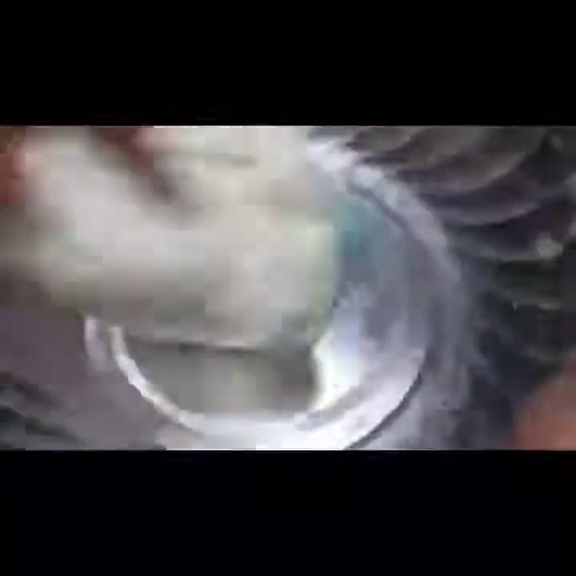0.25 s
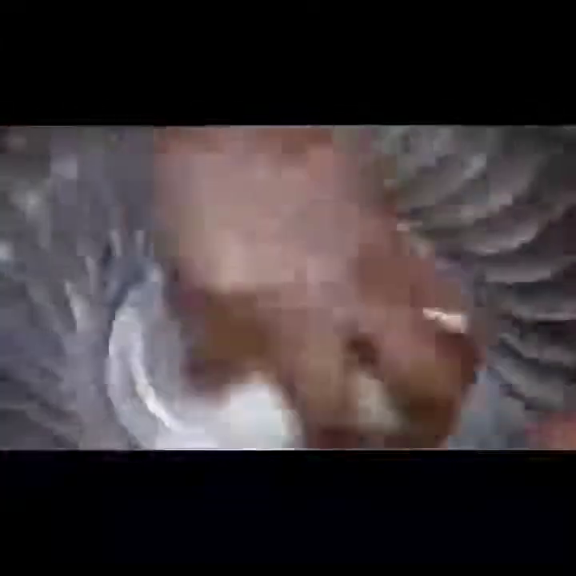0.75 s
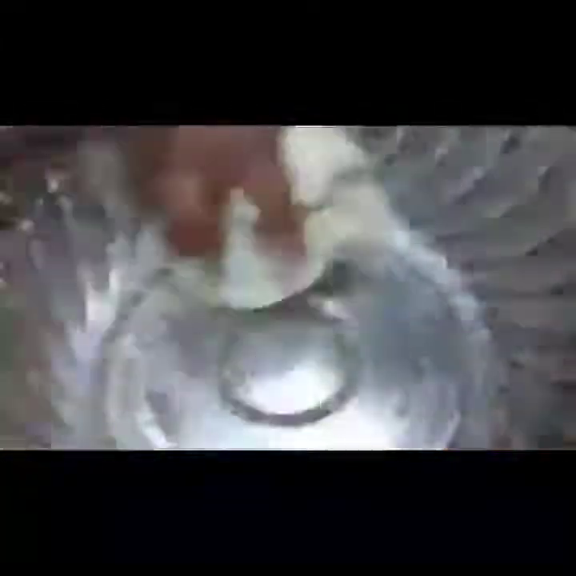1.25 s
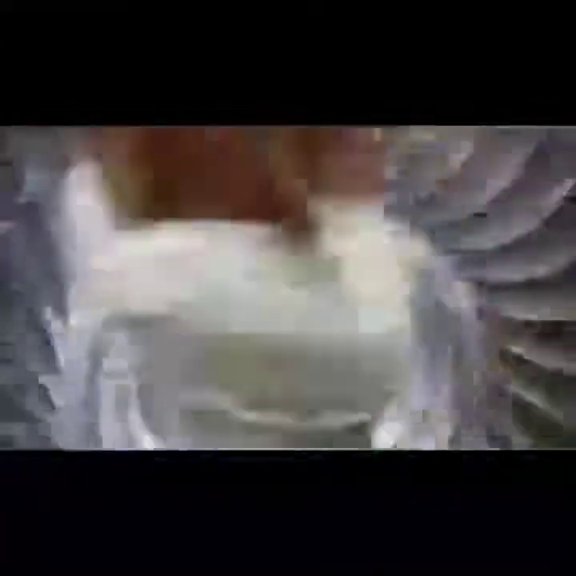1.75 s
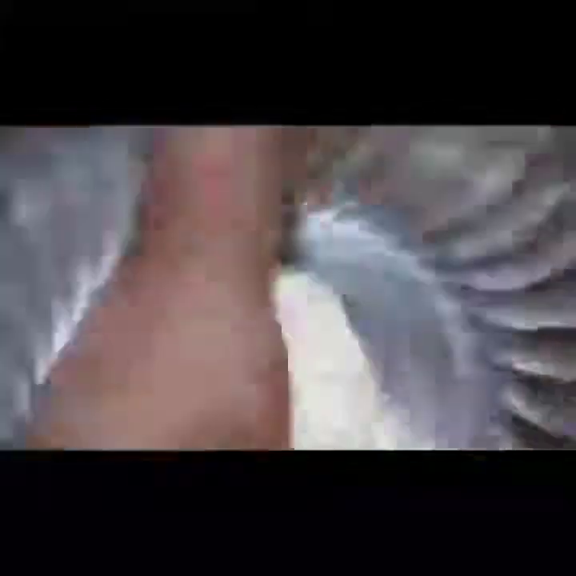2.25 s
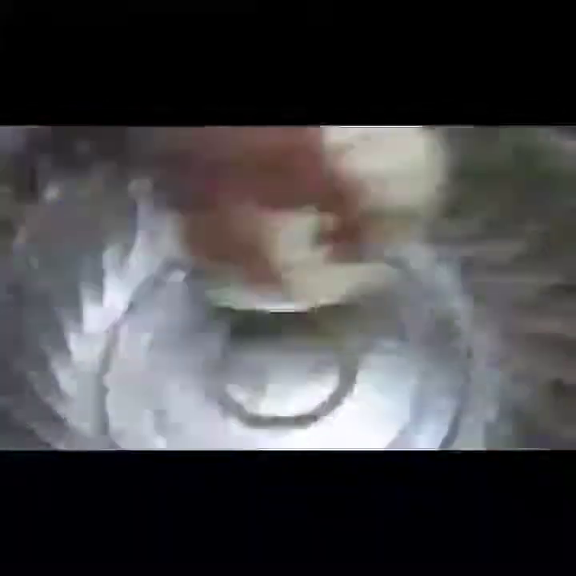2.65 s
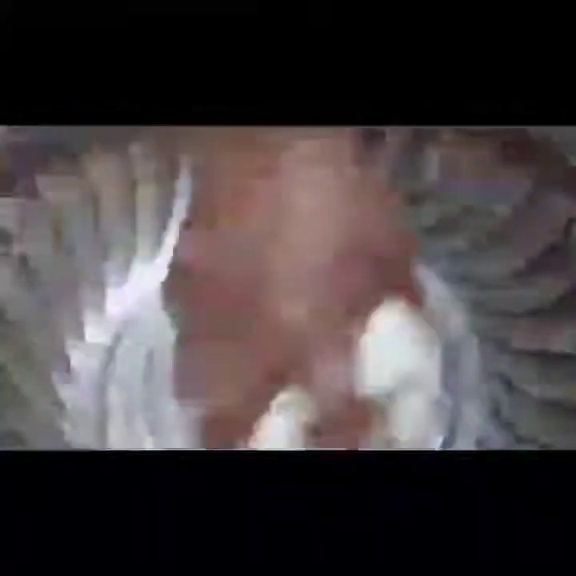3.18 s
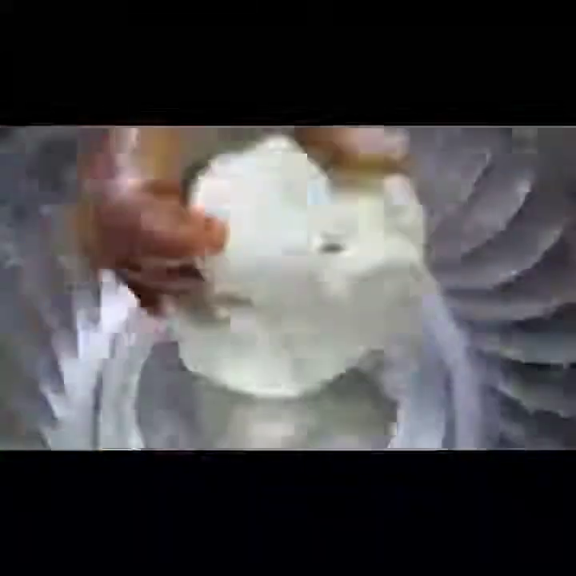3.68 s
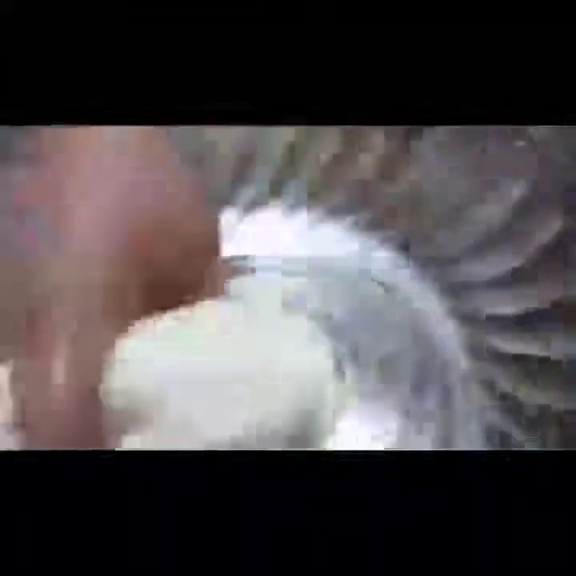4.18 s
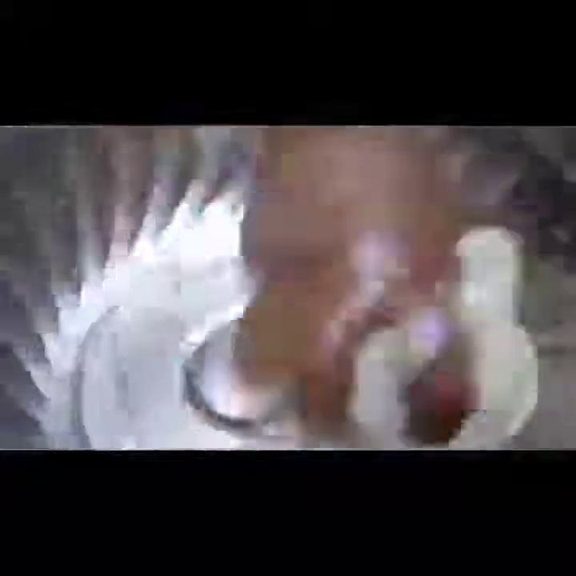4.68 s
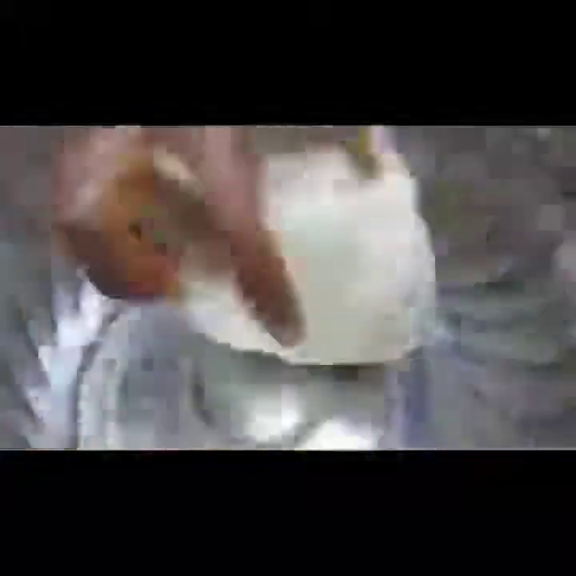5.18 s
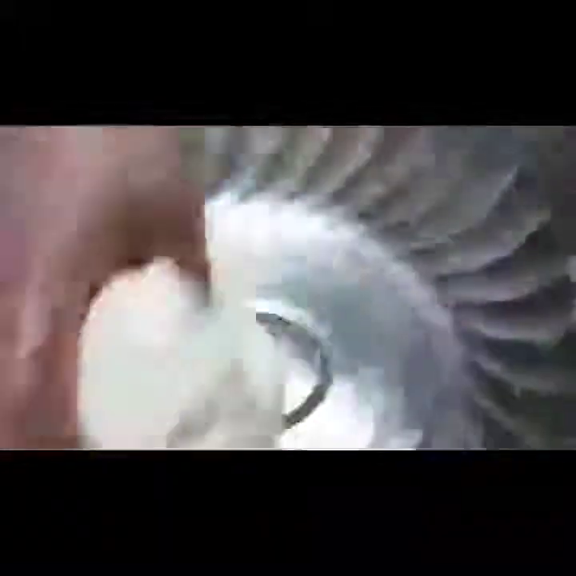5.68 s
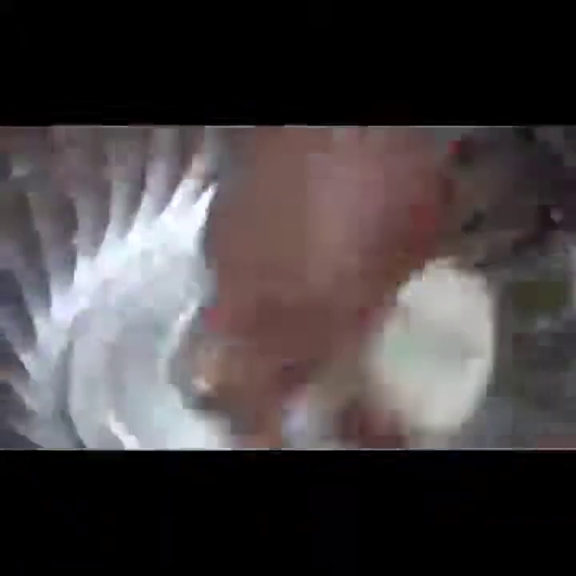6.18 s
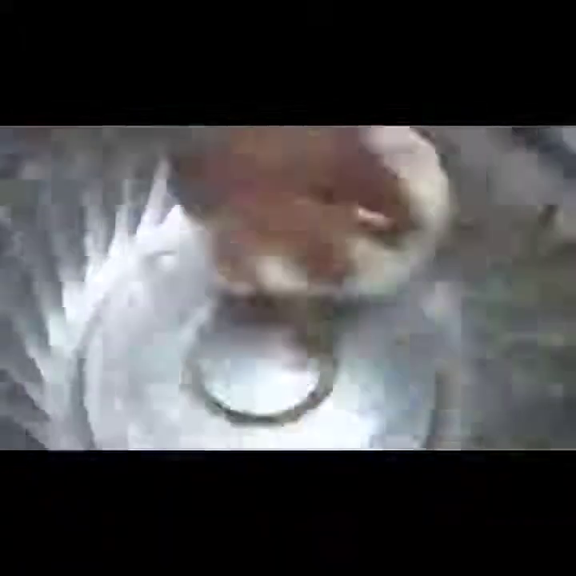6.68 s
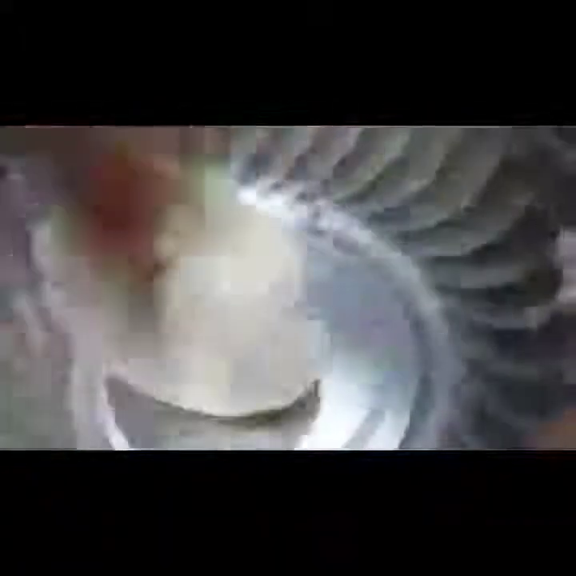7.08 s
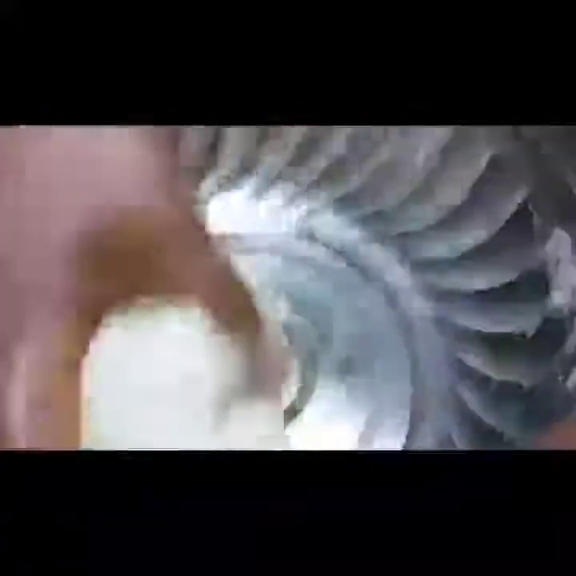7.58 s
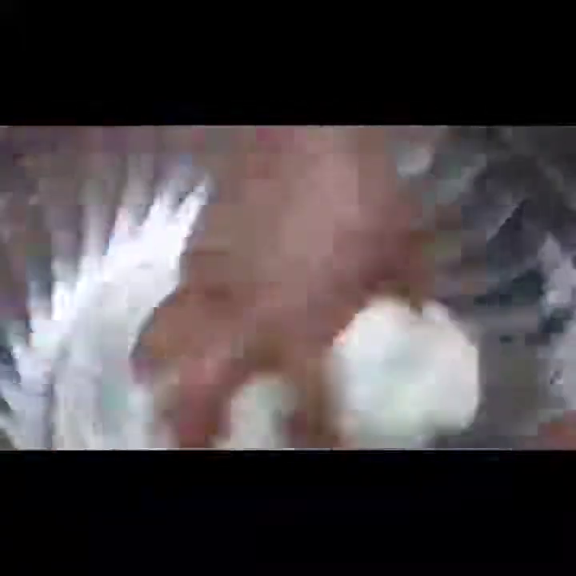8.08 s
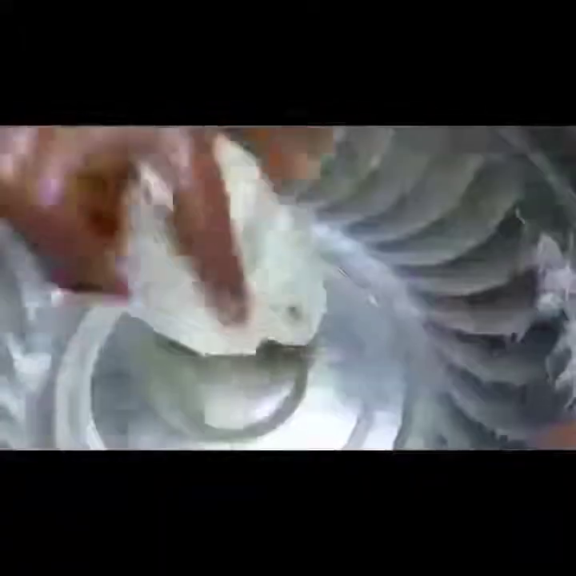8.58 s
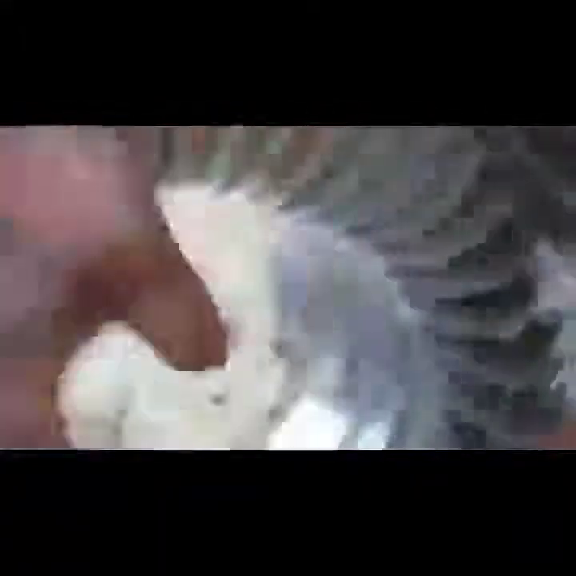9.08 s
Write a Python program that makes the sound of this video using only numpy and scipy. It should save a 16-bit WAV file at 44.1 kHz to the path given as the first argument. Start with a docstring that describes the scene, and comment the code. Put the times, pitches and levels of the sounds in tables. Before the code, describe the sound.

Hands knead oiled dough in a steel bowl, sticky squishes and drags mixing with hollow bowl knocks on a kitchen worktop.

```python
"""A small kitchen, heard close up in stereo: a hand kneads oiled dough in a fluted steel bowl.
The dough drags with a sticky noise hiss, crackles with tiny snaps and smacks in noise bursts. The bowl rumbles
as it rocks, and knocks on the worktop as decaying modes: a boom near 300 Hz, a steel clang when struck hard.
Heavy pushes thud, single wall modes sing out, a finger scratches the left port.
The left microphone port is nearer the bowl; a short room tail and quiet air surround it all."""
import sys
import numpy as np
from scipy import signal
from scipy.fft import rfft, irfft, next_fast_len
from scipy.io import wavfile
from scipy.ndimage import uniform_filter1d, map_coordinates

SR = 44100
rng = np.random.default_rng(int(sys.argv[2]) if len(sys.argv) > 2 else 0)


def int16_out(signal):
    """Quantize to a 16-bit WAV file."""
    q = np.round(np.clip(np.atleast_2d(signal).T, -1, 1) * 32767)
    wavfile.write(sys.argv[1], SR, q.astype(np.int16))


N = 411894

# The hand drags the dough over the flutes; the faint short row at 8.09 s is a brief swell of hiss that goes
# with a ring of the wall. Each row: full strength from in seconds, hold in seconds, hiss level in dB.
DOUGH_STROKES = [(.05, 0.05, -51.5), (.3, 0.14, -46.5), (.66, 0.23, -51.5), (1.2, 0.11, -42.5),
                 (1.328, 0.4, -43.5), (1.521, 0.3, -39.5), (1.97, 0.32, -55.5), (2.533, 0.32, -39.5),
                 (2.82, 0.3, -45.5), (3.42, 0.035, -50), (3.658, 0.012, -36.5), (4.15, 0.17, -49.5),
                 (4.46, 0.29, -51), (4.989, 0.23, -46.5), (5.43, 0.035, -54), (5.742, 0.32, -46),
                 (6.22, 0.48, -54.5), (6.47, 0.76, -47), (7.025, 0.06, -41.5), (7.259, 0.18, -50.5),
                 (7.766, 0.079, -45), (8.09, .05, -56.5), (8.427, 0.3, -48.5), (9.091, 0.23, -51.5)]
RISE_DB_PER_S, FALL_DB_PER_S, REST_DB = 137, 128, -71.5
# Short squishes as the dough is squeezed. Each row: peak time in seconds, hiss level in dB.
DOUGH_SQUISHES = [(2.584, -31.5), (2.81, -26), (3.252, -39.5), (3.709, -28), (3.803, -36.5), (4.38, -34.5),
                  (4.626, -40), (5.132, -36.5), (5.249, -36.5), (6.568, -39.5), (7.176, -37.5),
                  (9.316, -36)]
SQUISH_DB_PER_S = 368  # swells and fades alike
# Colour of the dragging dough. Each row: frequency in Hz, relative density in dB per Hz.
HISS_COLOUR = [(400, -5.5), (565, 0), (823, -7), (1480, -5), (2150, -9), (2860, -2), (7050, -6.5),
               (10300, -0.5), (14500, -5.5)]
# Colour of the rocking bowl. Each row: frequency in Hz, relative density in dB per Hz.
RUMBLE_COLOUR = [(24, -53), (40, -8.5), (136, 4.5), (203, -8.5), (319, 2.5), (1200, -19), (2640, -120)]
# Colour of the quiet kitchen air. Each row: frequency in Hz, relative density in dB per Hz.
AIR_COLOUR = [(2400, -28), (4030, 14), (14500, 8)]
# The bowl meets the worktop. Each row: start in seconds, level in dB, body and clang in dB relative to that level.
BOWL_KNOCKS = [(0.059, -39, -1, -10), (0.281, -24.5, -17.5, -40), (0.316, -21, -18.5, -32),
               (0.584, -11, -12, -6), (0.77, -22, -15.5, -19.5), (1, -32, -16, -13.5),
               (1.144, -25.5, -33, -35), (1.182, -29, -14.5, -20), (2.11, -17.5, -5.5, -5.5),
               (2.474, -30, -18, -34), (2.548, -26, -13, -24), (2.628, -17.5, -17, -35),
               (2.938, -34, -13, -4), (3.051, -36, -24, -37), (3.126, -30, -5.5, -3),
               (3.223, -22, -15, -15.5), (3.25, -32.5, -24, -3), (3.698, -15, -5.5, -7),
               (4.193, -45.5, 0, 6), (4.242, -20, -11.5, -21), (4.426, -29.5, -26, -37),
               (4.575, -35.5, -12, -33), (4.787, -35.5, -9.5, -17), (4.912, -32.5, -30, -13.5),
               (5.422, -37, -7.5, -38), (5.602, -37.5, -18, -18.5), (5.826, -21.5, -7, -14.5),
               (6.105, -25.5, -11.5, -17), (6.254, -27.5, -15.5, -39), (6.468, -23.5, -10.5, -29),
               (6.94, -32, -26, -35), (7.168, -25.5, -3, 1.5), (7.342, -17.5, -39.5, -23),
               (7.349, -14.5, -6, -2), (7.376, -14, -18, -12), (7.539, -40.5, 2, -10),
               (8.513, -30.5, -8.5, -12), (8.709, -26.5, -7, -10.5), (8.896, -38.5, -16, -37),
               (9.113, -35, -21, -14), (9.274, -31, -15, -17)]
# The bowl's boom, damped by dough and hand, then its fainter long ring. Each row: Hz, level in dB, t60 in seconds.
BOOM_MODES = [(301.3, 7, 0.054), (319.6, -7.5, 0.15), (247, -24.5, 0.21)]
# The boom comes back twice after every knock. Each row: delay in seconds, level in dB relative to the knock.
BOOM_RETURNS = [(.057, -14.5), (.113, -21)]
# Wall modes of the bowl. Each row: frequency in Hz, level in dB, t60 in seconds.
STEEL_MODES = [(542, 5.5, 0.061), (648, 6, 0.11), (918.4, 7.5, 0.047), (987.6, 8, 0.039), (1474, 5, 0.077),
               (1718, 1, 0.066), (1936, 5.5, 0.036), (2695, 0, 0.068), (3420, -9.5, 0.12), (3600, 0, 0.036),
               (4070, 8.5, 0.029), (4620, 12, 0.016)]
# Modes of the worktop. Each row: frequency in Hz, level in dB, t60 in seconds.
WORKTOP_MODES = [(82.5, 2.5, 0.21), (139.3, 2, 0.33)]
# Dough and fingers smack or peel off. Each row: start in seconds, level in dB.
DOUGH_SMACKS = [(0.225, -34), (0.2507, -32), (0.4869, -31), (1.498, -19.5), (2.086, -30.5), (2.7283, -12.5),
                ]
# Colour of a smack. Each row: frequency in Hz, relative density in dB per Hz.
SMACK_COLOUR = [(300, -17.5), (2200, -13), (4900, -5.5), (7500, -10.5), (14500, -6.5)]
# The weight of the hand lands and thuds the worktop. Each row: start in seconds, level in dB.
HAND_PUNCHES = [(0.314, -24), (2.549, -19), (3.697, -19), (4.245, -25), (4.92, -34.5), (7.345, -22)]
PUNCH_T60_S = 0.26  # extra damping: the hand stays down on the thud
# A blow or fingertip finds a free stretch of wall and one mode sings out.
# Each row: start in seconds, nearby frequency in Hz, level in dB, t60 in seconds.
WALL_NOTES = [(0.584, 3400, -32, 0.35), (2.111, 1940, -19.5, 0.037), (2.934, 645, -27, 0.088),
              (2.951, 1000, -35.5, 0.082), (3.025, 2730, -44, 0.055), (3.126, 645, -25, 0.13),
              (3.126, 3600, -40, 0.077), (3.22, 1000, -23, 0.054), (4.243, 925, -26, 0.043),
              (4.459, 645, -35.5, 0.15), (7.17, 645, -26, 0.12), (7.736, 1000, -32.5, 0.11),
              (8.073, 2730, -55, 0.33), (8.55, 3600, -58, .6), (8.524, 1000, -25, 0.051),
              (8.708, 1000, -24, 0.031), (8.72, 925, -26, 0.057)]
# A finger brushes the left port. Each row: start in seconds, starting level in dB, length in seconds.
PORT_BRUSHES = [(8.159, -33, .01), (8.1657, -25, 0.033)]
# Decay of the room. Each row: frequency in Hz, t60 in seconds.
ROOM_DECAY = [(300, 0.42), (2000, 0.54), (8000, 0.3)]
# The left port is nearer the bowl. Each row: frequency in Hz, left over right in dB.
LEFT_OVER_RIGHT = [(60, 7.5), (300, 4.5), (600, -2), (1300, 10.5), (4400, 3), (9000, 3.5)]
LEFT_LEAD_S = 0.000324
BASS_HZ, PORT_HZ, TOP_HZ = 43.4, 14700, 15800  # bass roll-off, treble drop, band limit


def amp(db):
    """Gain of a level in dB."""
    return 10 ** (np.asarray(db) / 20)


def unit(x):
    """x at rms 1."""
    return x / np.sqrt(np.mean(x ** 2) + 1e-20)


def along(points, hz):
    """Read (Hz, value) points on a log frequency axis."""
    f, v = np.transpose(points)
    return np.interp(np.log(hz + 1), np.log(f + 1), v)


def wobble(rate):
    """A smooth random curve with rate knots a second."""
    knots = rng.standard_normal(int(N * rate / SR) + 4)
    return map_coordinates(knots, [np.arange(N) * rate / SR])


def filtered(x, response):
    """x shaped by a complex response of frequency."""
    m = next_fast_len(N + SR // 2)
    return irfft(rfft(x, m) * response(np.fft.rfftfreq(m, 1 / SR)), m)[..., :N]


def rush(colour, patchy_db, channels=1):
    """Coloured noise of rms 1, with time-frequency patches of random gain shared by its channels."""
    z = signal.stft(rng.standard_normal((channels, N)), nperseg=256)[2]
    patches = uniform_filter1d(rng.standard_normal(z.shape[1:]), size=8, axis=0)
    patches = uniform_filter1d(patches, size=8, axis=1)
    noise = signal.istft(z * amp(patchy_db * unit(patches)), nperseg=256)[1][:, :N]
    return unit(filtered(noise, lambda hz: amp(along(colour, hz))))


def ring(modes, t, spread_db, attack, rough=0, colour=((1, 0),)):
    """One blow: every mode at a new strength, detuned and made unsteady by the load of dough."""
    hz, db, t60 = np.transpose(modes)[:, :, None]
    luck = rng.standard_normal((2, len(modes), 1))
    drift = rough * np.cumsum(rng.standard_normal((len(modes), len(t))), axis=1)
    level = amp(db + along(colour, hz) + spread_db * luck[0] - 60 * t / t60)
    waves = level * np.sin(2 * np.pi * hz * (1 + 0.0053 * luck[1]) * t + drift)
    return waves.sum(axis=0) * (1 - np.exp(-t / attack))


def place(out, start, sound):
    """Mix a sound into out from a start sample."""
    out[start:][:len(sound)] += sound


def handling_db():
    """Hand effort as hiss level: every stroke rises, holds and falls, every squish peaks; their powers add."""
    t, power = np.arange(N) / SR, amp(2 * REST_DB)
    for s, held, db in DOUGH_STROKES:
        rise = RISE_DB_PER_S * np.maximum(s - t, 0)
        fall = FALL_DB_PER_S * np.maximum(t - s - held, 0)
        power = power + amp(db - rise - fall) ** 2
    for s, db in DOUGH_SQUISHES:
        power = power + amp(db - SQUISH_DB_PER_S * np.abs(t - s)) ** 2
    return 10 * np.log10(power)


def sticky_crackle():
    """Tiny sticky threads snap at random, each a very short burst of noise."""
    happens = rng.random(N) < 700 / SR  # about 700 snaps a second
    strength = amp(np.minimum(5 * rng.exponential(size=N), 15))
    snaps = happens * strength * rng.choice([-1, 1], N)
    t = np.arange(SR // 100) / SR
    burst = amp(-60 * t / 0.00073) * rng.standard_normal(len(t))
    return unit(filtered(np.convolve(snaps, burst)[:N], lambda hz: amp(along(HISS_COLOUR, hz))))


def wall_response(f):
    """The steel wall as a sum of resonances: the drag excites each mode around its own pitch."""
    return sum(amp(db) * 1j * f * 2.2 / t60 / (hz * hz - f * f + 1j * f * 1.7 / t60)
               for hz, db, t60 in STEEL_MODES)


def dough_drag(effort_db):
    """Oiled dough drags over the flutes: friction hiss, snaps on top and a faintly singing wall."""
    hiss_db = effort_db + 2.45 * wobble(35) + 1.6 * wobble(130)
    common, left, right = rush(HISS_COLOUR, patchy_db=2.5, channels=3)
    # a wide contact patch: mostly unrelated at the two ports
    hiss = 0.5 * common + 1.11 * np.array([left, right])
    singing = amp(-8.5) * unit(filtered(common, wall_response))
    return amp(hiss_db) * (hiss + singing + amp(-14.0) * sticky_crackle())


def bowl_rocking(effort_db):
    """The bowl rocks in a low rumble; a stronger stroke rocks it more."""
    rocking_db = 0.3 * effort_db - 37.0 + 0.26 * wobble(7.6)
    return amp(rocking_db) * rush(RUMBLE_COLOUR, patchy_db=5.5)[0]


def kitchen_air():
    """Quiet, patchy air noise, unrelated at the two ports."""
    return amp(-67.5) * rush(AIR_COLOUR, patchy_db=9.0, channels=2)


def bowl_knocks():
    """Each knock booms and thuds the worktop, sounds the bowl's body and, if hard, makes the steel clang."""
    out, t = np.zeros(N + SR), np.arange(SR // 3) / SR
    body_band = signal.butter(2, [500, 1600], "band", fs=SR)
    clang_band = signal.butter(2, [1400, 5500], "band", fs=SR)
    dying = amp(3.5 - 60 * t / 0.0077) + amp(-3.0 - 60 * t / 0.22)  # fast decay, then a long tail
    for s, db, body_db, clang_db in BOWL_KNOCKS:
        noise = rng.standard_normal((2, len(t))) * dying  # modes too dense to tell apart
        dense = amp(body_db + 4.0) * signal.lfilter(*body_band, noise[0])
        dense += amp(clang_db) * signal.lfilter(*clang_band, noise[1])
        # the crack of first contact
        dense += amp(clang_db - 4 - 60 * t / 0.0091) * signal.lfilter(*clang_band, noise[0])
        tilt = [(1100, body_db - 1.5), (1400, clang_db - 5.0)]
        steel = ring(STEEL_MODES, t, spread_db=4.0, attack=0.0021, rough=0.098, colour=tilt)
        boom = ring(BOOM_MODES, t, spread_db=0.5, attack=0.0044)
        thud = ring(WORKTOP_MODES, t, spread_db=4.0, attack=0.0035, rough=0.028)
        thud *= amp(-0.4 * db - 29.5)  # grows more slowly than the boom
        start = round(s * SR) - 70
        place(out, start, amp(db) * (amp(1.2) * boom + thud))
        # the dough yields first, then the steel meets the worktop
        place(out, start + 70, amp(db) * (steel + dense))
        for delay, back_db in BOOM_RETURNS:
            place(out, start + round(delay * SR), amp(db + back_db) * boom)
    return out[:N]


def dough_smacks():
    """Dough and fingers slap or peel off: noise with a quick decay and a fainter long one."""
    envelope, t = np.zeros(N + SR), np.arange(SR // 4) / SR
    decay = amp(-60 * t / 0.024) + amp(-8.0 - 60 * t / 0.27)
    for s, db in DOUGH_SMACKS:
        place(envelope, round(s * SR), amp(db) * decay)
    return envelope[:N] * rush(SMACK_COLOUR, patchy_db=6.5, channels=2)


def hand_punches():
    """The landing hand rings the worktop's low modes and damps them by staying down."""
    out, t = np.zeros(N + SR), np.arange(SR // 3) / SR
    for s, db in HAND_PUNCHES:
        thud = ring(WORKTOP_MODES, t, spread_db=-3.0, attack=0.01, rough=0.056)
        place(out, round(s * SR), amp(db - 60 * t / PUNCH_T60_S) * thud)
    return out[:N]


def wall_notes():
    """One free wall mode sings out: a single decaying, slightly unsteady sine."""
    out, t = np.zeros(N + SR), np.arange(SR // 3) / SR
    for s, near, db, t60 in WALL_NOTES:
        hz = min(STEEL_MODES, key=lambda mode: abs(mode[0] - near))[0]
        note = ring([(hz, db, t60)], t, spread_db=2.5, attack=0.00074, rough=0.075)
        place(out, round(s * SR), note)
    return out[:N]


def finger_brush():
    """A rough noise scratch, far stronger at the left port, that fades and stops short."""
    envelope = np.zeros(N)
    for s, db, length in PORT_BRUSHES:
        u = np.linspace(0, 1, round(length * SR))
        envelope[round(s * SR):][:len(u)] = amp(db - 16.0 * u) * np.clip(6 * (1 - u), 0, 1)
    scratch = envelope * amp(2.6 * wobble(900)) * rush(HISS_COLOUR, patchy_db=-1.5)[0]
    return scratch * amp([[0], [-24]])


def kitchen_room(x, count=32):
    """The room answers in decaying noise; the hand keeps moving, so each stretch gets its own tail."""
    out, step = np.zeros((2, N + SR)), N // count + 1
    for k in range(count):
        hz, t, z = signal.stft(rng.standard_normal((2, SR // 2)), SR, nperseg=256)
        # long waves reach both ports alike
        z[1] = np.where(hz[:, None] < 500, 1.15 * z[0] + 0.53 * z[1], z[1])
        decay = amp(-60 * t / along(ROOM_DECAY, hz)[:, None])
        tail = signal.istft(z * decay, SR, nperseg=256)[1]
        tail = tail / np.linalg.norm(tail[0])
        wet = signal.fftconvolve(x[None, k * step:(k + 1) * step], tail, axes=1)
        out[:, k * step + 200:][:, :wet.shape[1]] += wet  # 200 samples of pre-delay
    return out[:, :N]


def ports(x):
    """The left port hears the bowl earlier, and louder in most of the range."""
    side = np.array([[0.5], [-0.5]])
    return filtered(x, lambda hz: amp(side * along(LEFT_OVER_RIGHT, hz))
                    * np.exp(2j * np.pi * hz * side * LEFT_LEAD_S))


def scene():
    """Dough and bowl, direct and in the room, over the quiet air of the kitchen."""
    effort_db = handling_db()
    soft = dough_drag(effort_db) + dough_smacks()
    hard = bowl_rocking(effort_db) + bowl_knocks() + hand_punches() + wall_notes()
    # the clang beams upward; mostly the boom fills the room
    spread = filtered(hard, lambda hz: 1 / (1 + 1j * hz / 1200))
    wet = kitchen_room(amp(-6.5) * (soft[0] + spread)) * amp([[1.5], [-1.5]])
    return ports(soft + hard) + wet + finger_brush() + kitchen_air()


def record(dry):
    """The ports lose the deep bass, drop sharply in the top treble and pass nothing above the band limit."""
    def response(hz):
        treble = np.where(hz > PORT_HZ, amp(-48 - 0.027 * (hz - PORT_HZ)), 1)
        return treble * (hz < TOP_HZ) / (1 - 1j * BASS_HZ / (hz + 1)) ** 2
    return filtered(dry, response)


dry = scene()
out = record(dry)
int16_out(out)
```